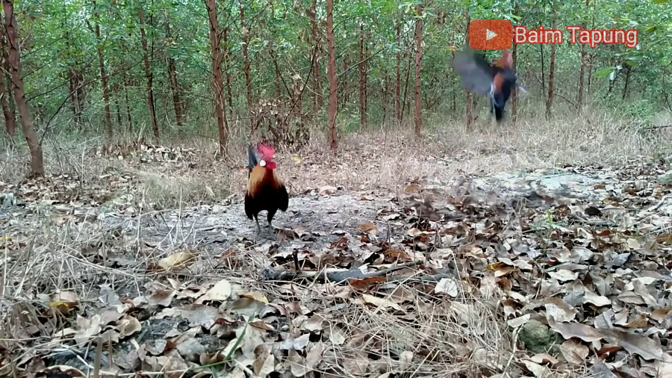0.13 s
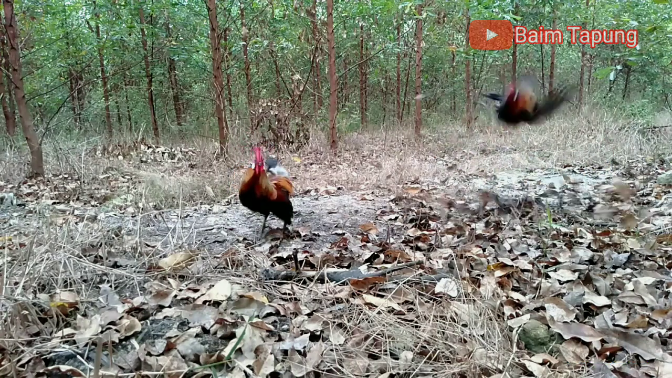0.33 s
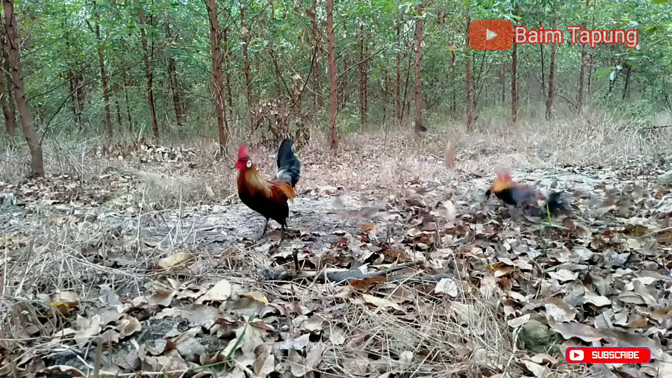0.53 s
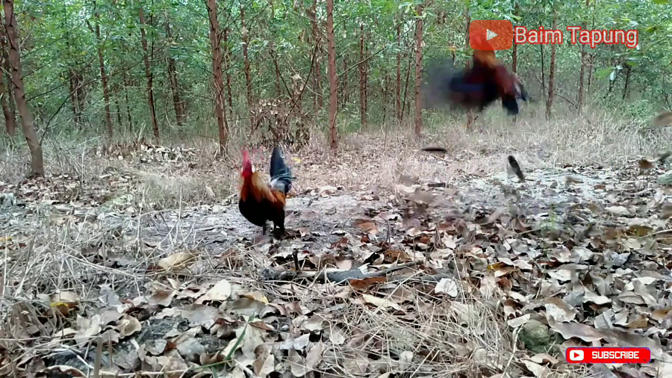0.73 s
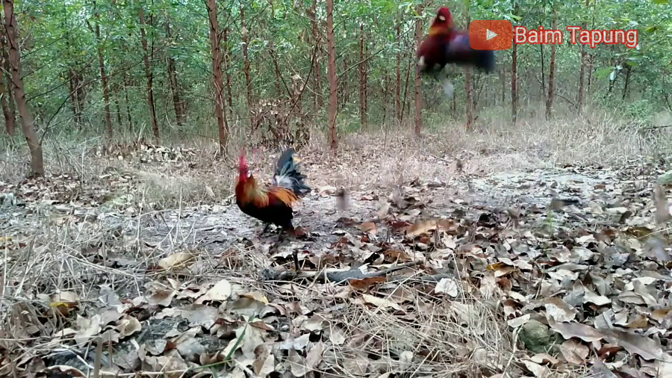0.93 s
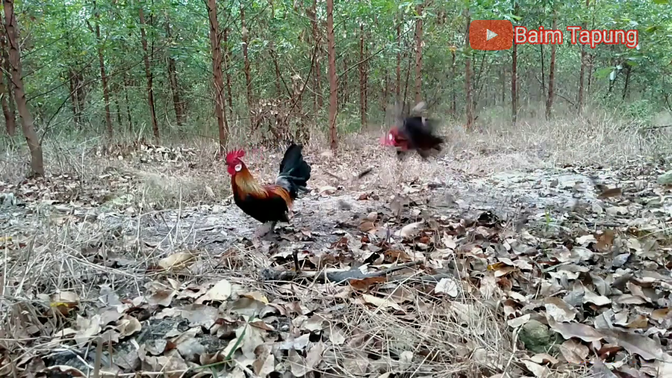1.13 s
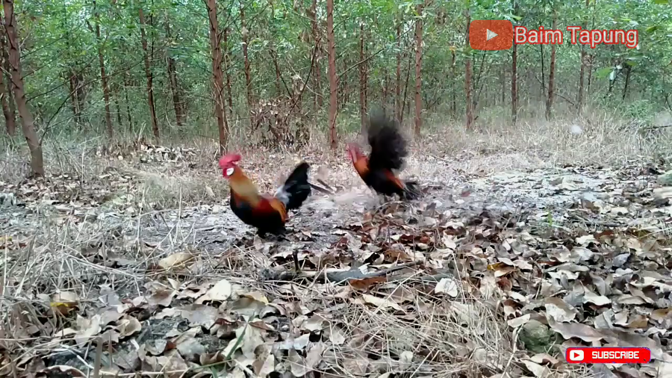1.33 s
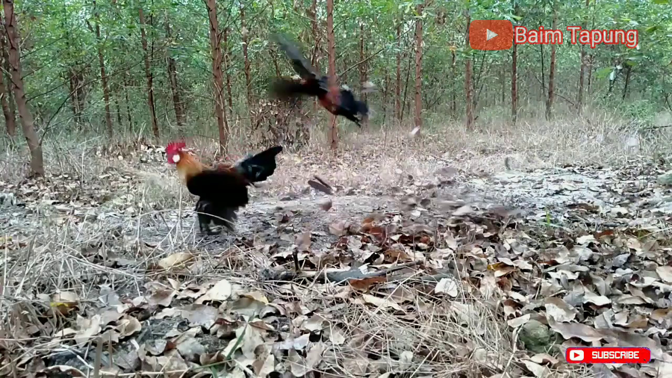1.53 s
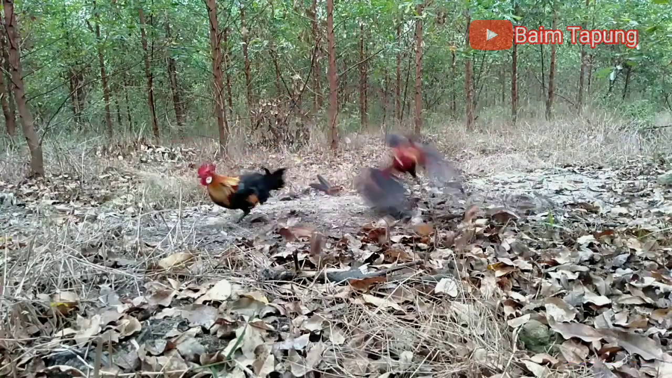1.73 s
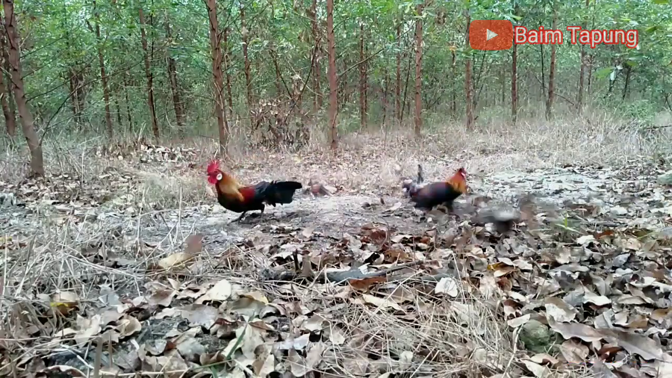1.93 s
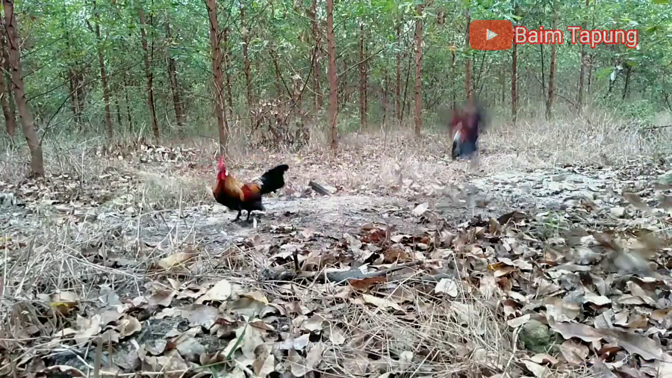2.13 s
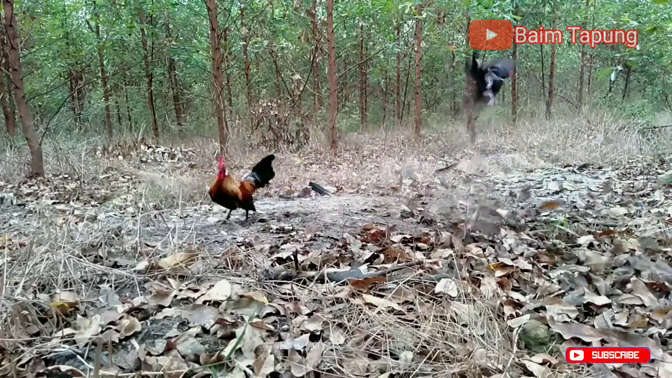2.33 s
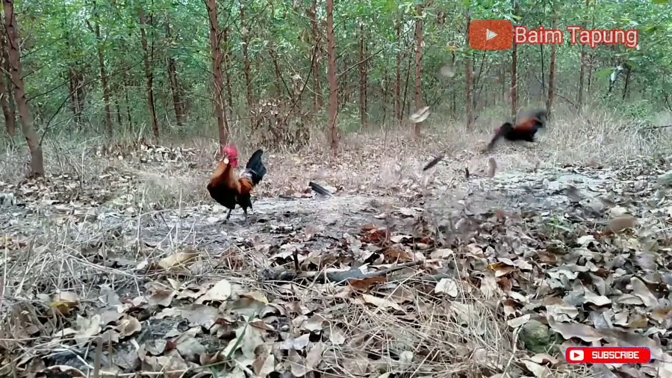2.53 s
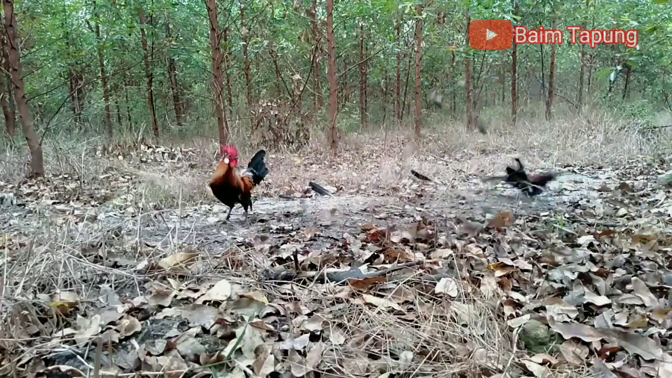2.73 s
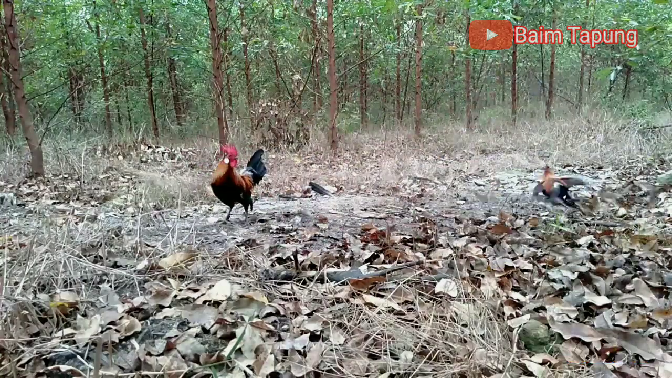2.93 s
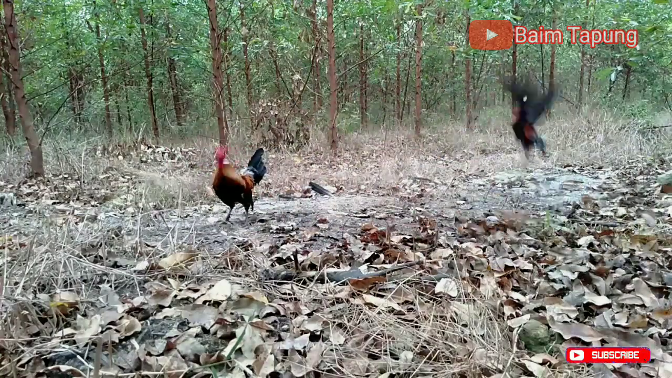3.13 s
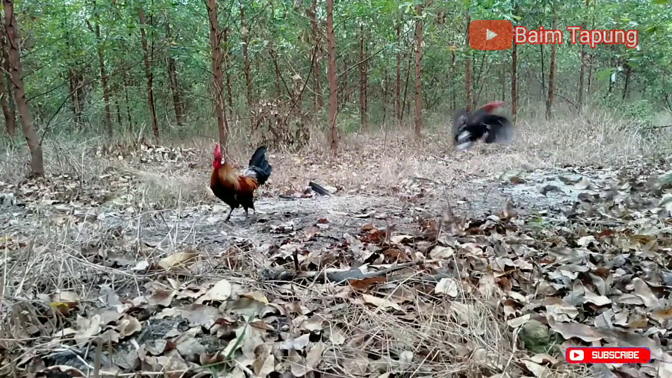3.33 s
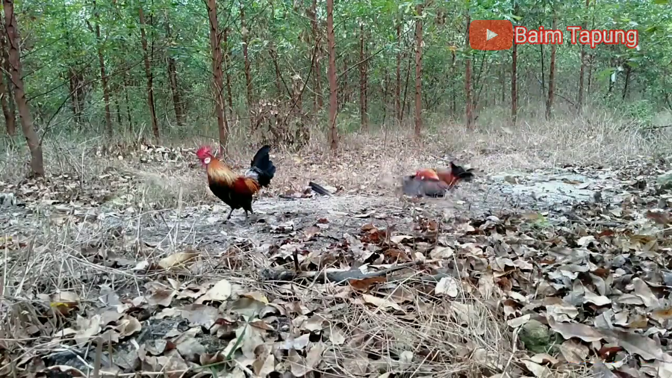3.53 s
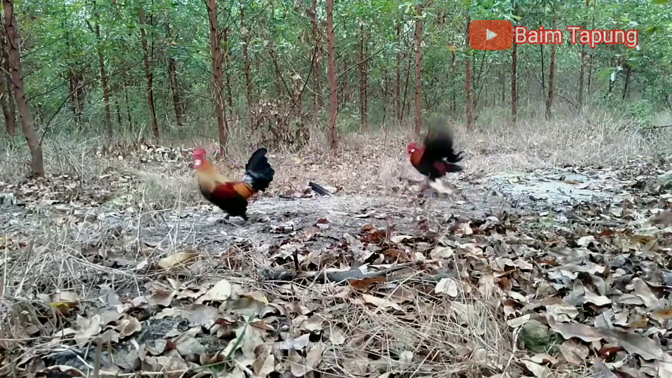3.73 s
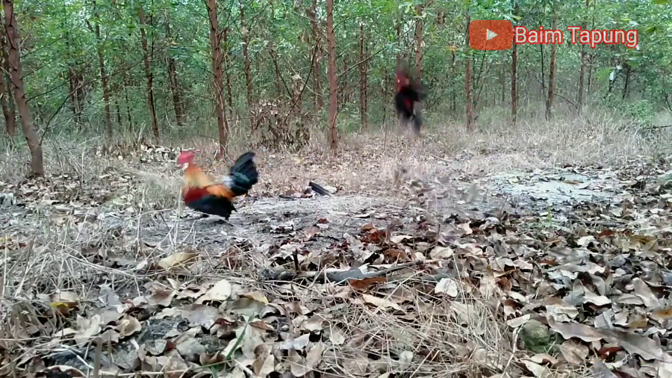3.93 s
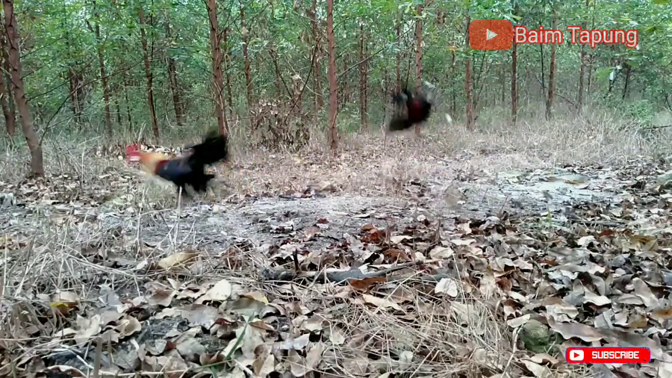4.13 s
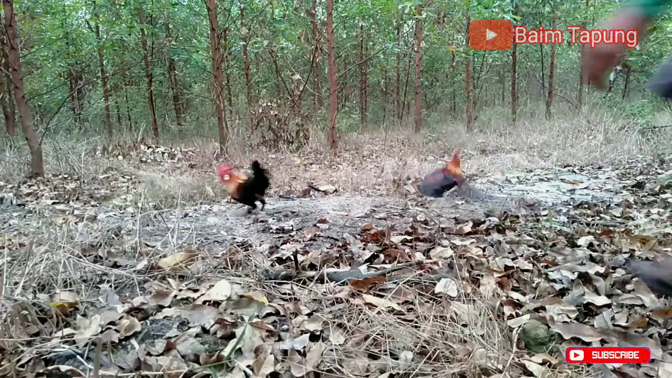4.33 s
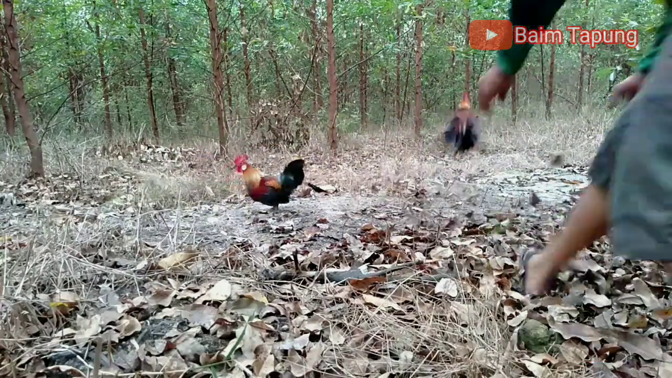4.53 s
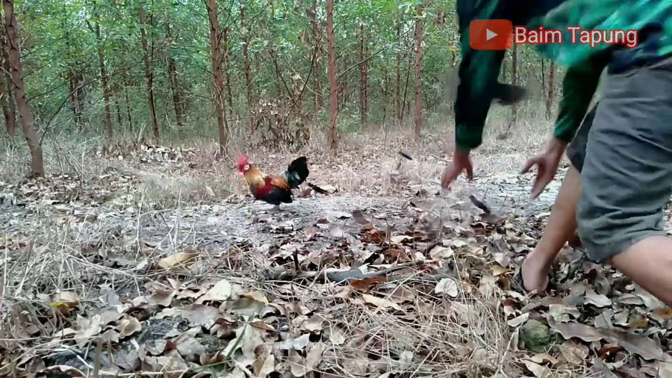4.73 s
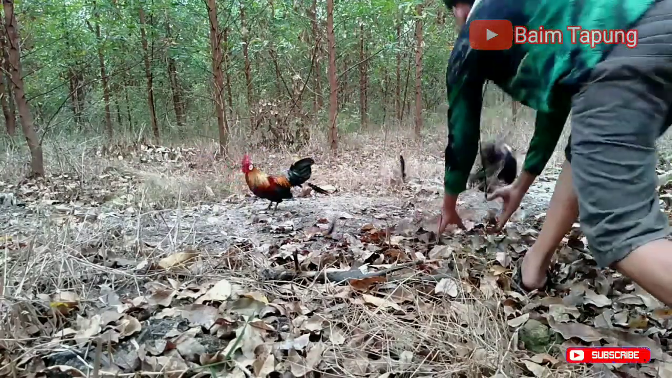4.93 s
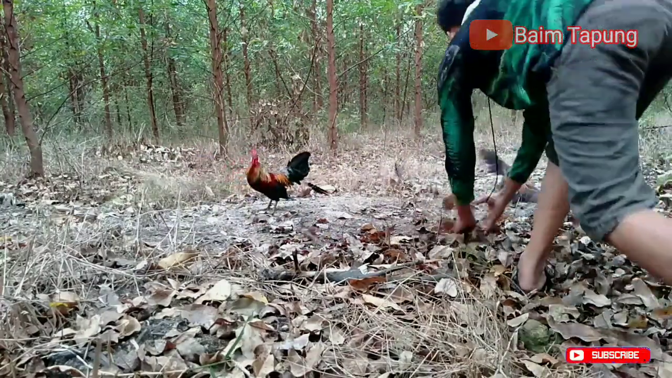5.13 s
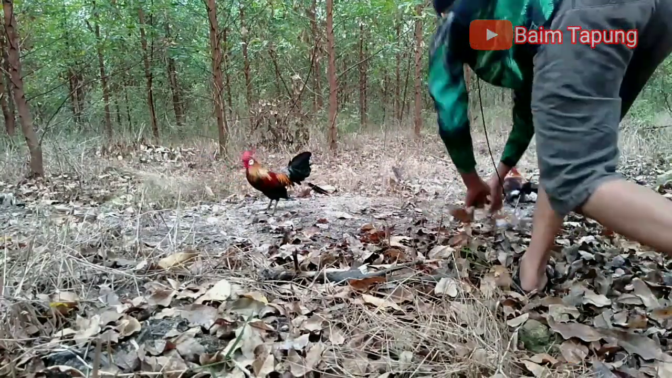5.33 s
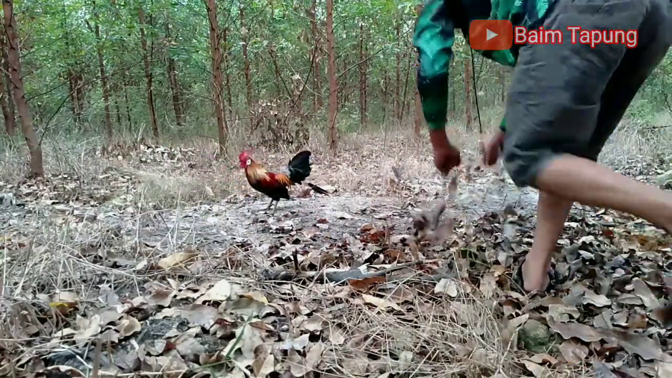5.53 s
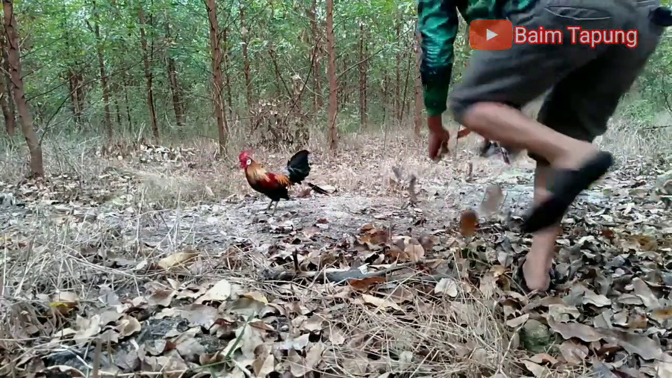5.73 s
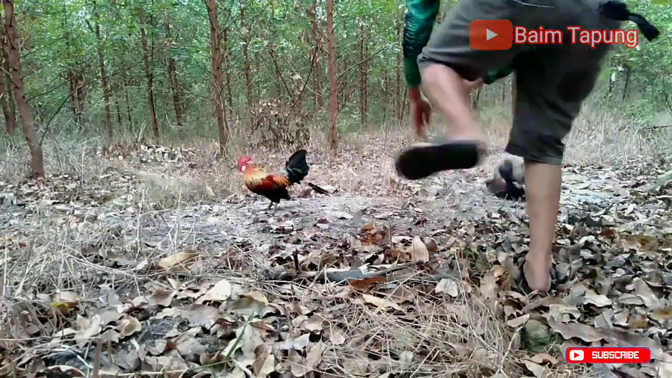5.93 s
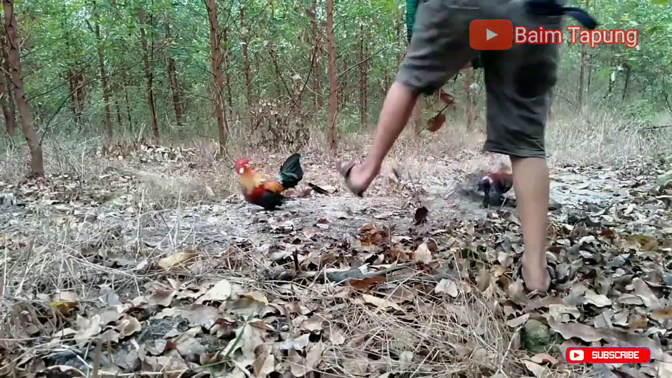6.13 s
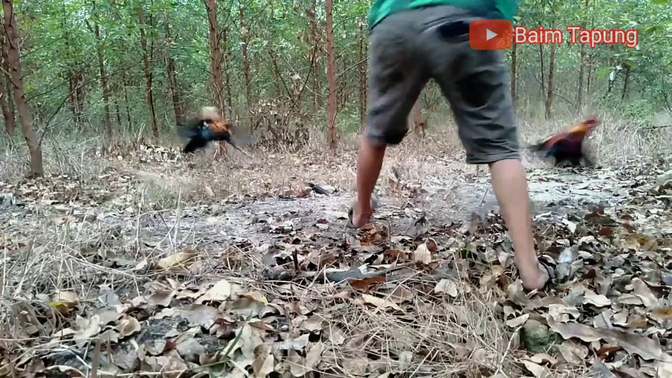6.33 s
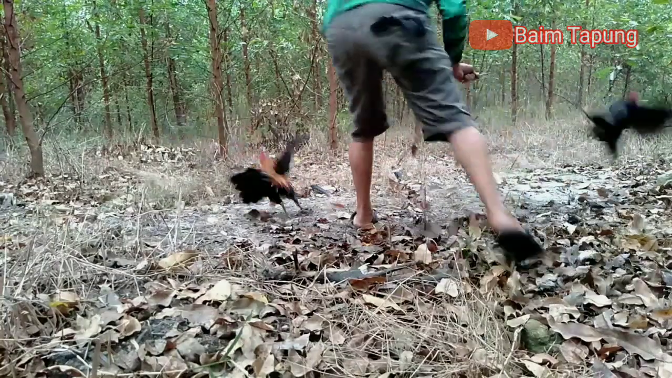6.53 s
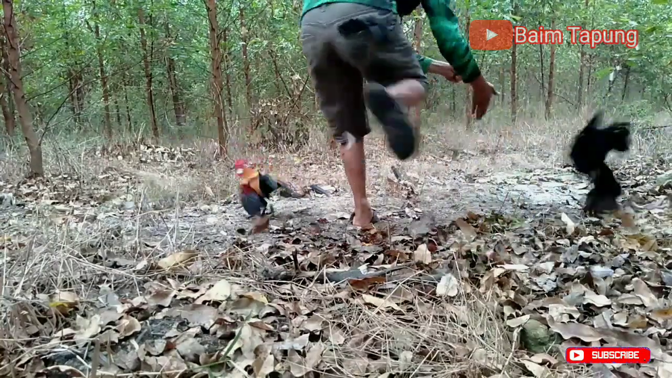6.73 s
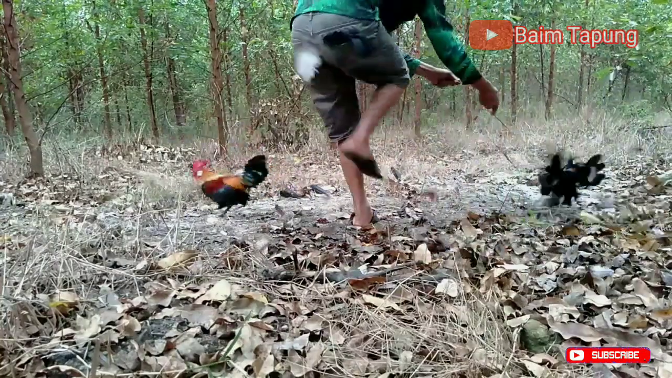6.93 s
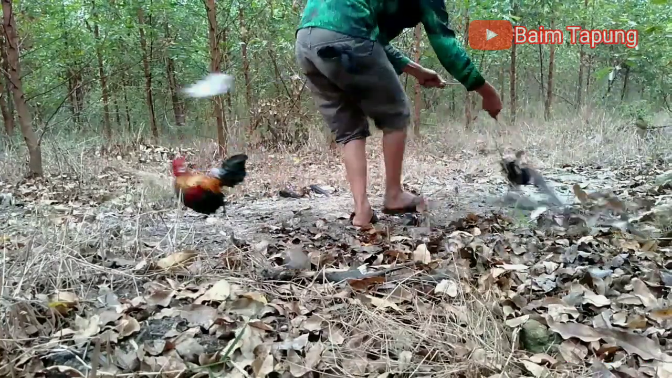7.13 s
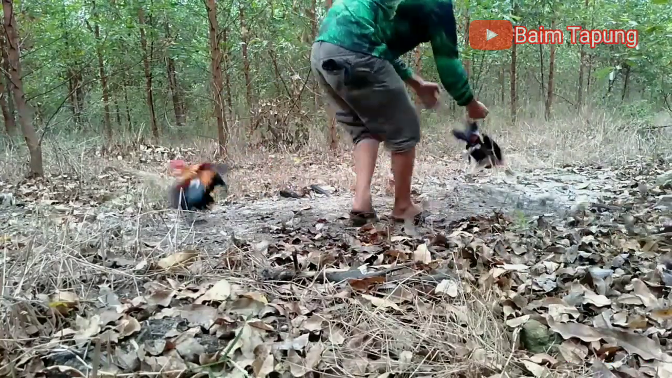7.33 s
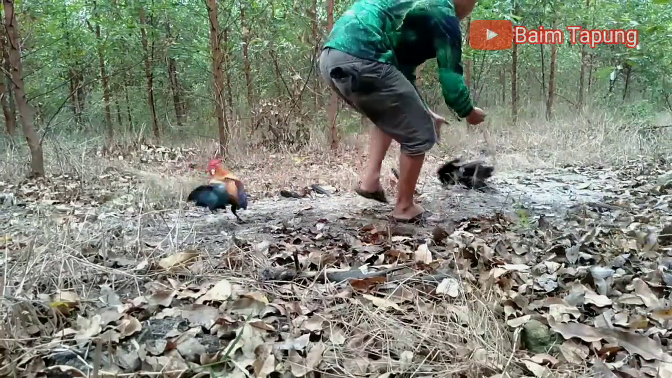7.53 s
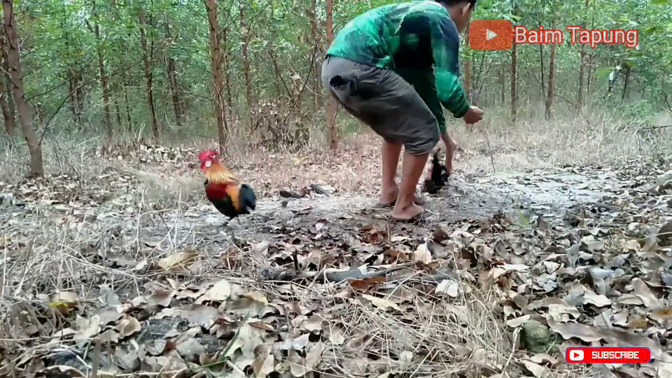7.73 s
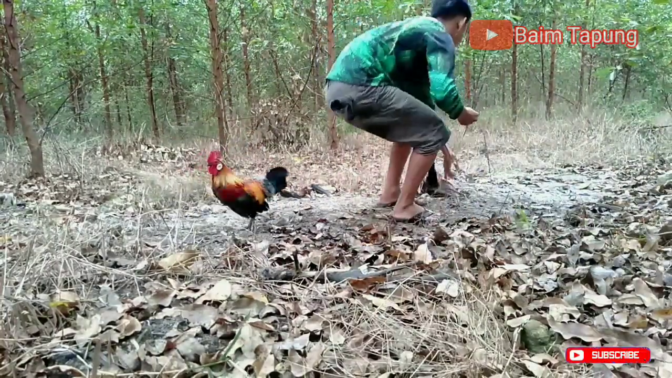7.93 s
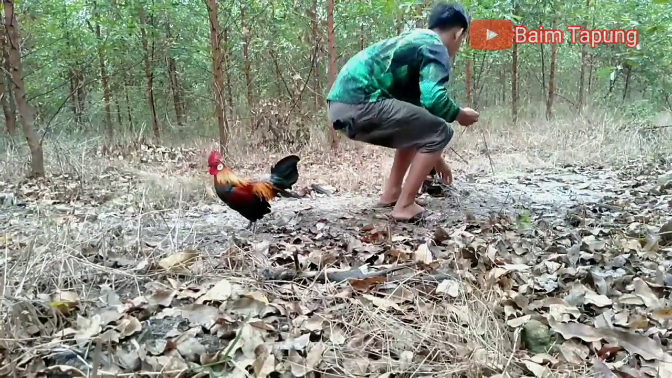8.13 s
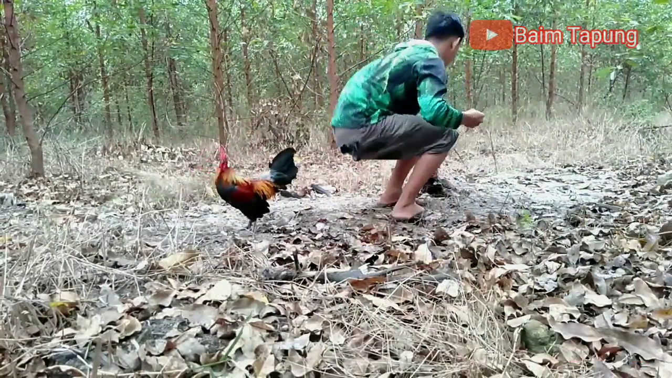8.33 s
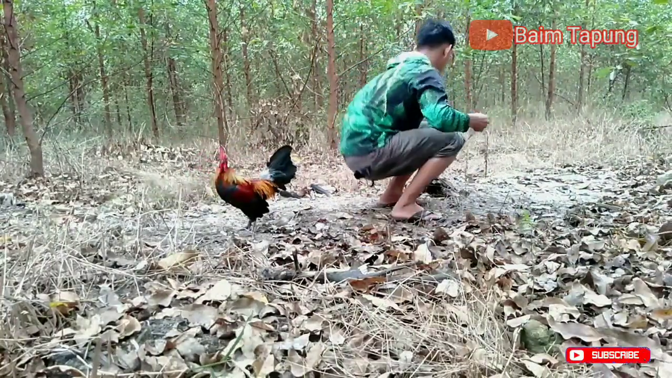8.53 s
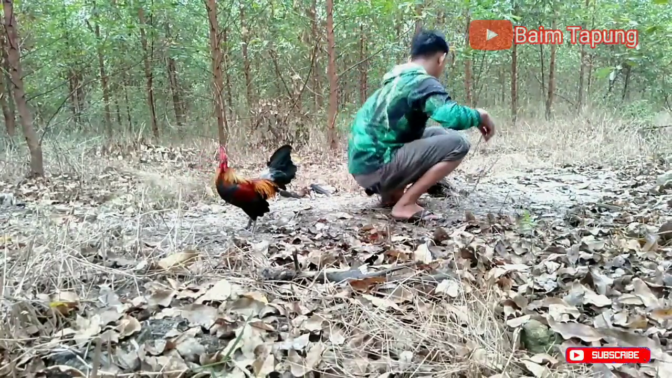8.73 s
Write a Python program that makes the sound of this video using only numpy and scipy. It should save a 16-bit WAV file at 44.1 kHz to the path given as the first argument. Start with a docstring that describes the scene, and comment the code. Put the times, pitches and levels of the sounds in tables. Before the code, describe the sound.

Dry leaves crackle from the start as a wild chicken beats its wings on a forest floor, buffeting the nearby microphone with low puffs of air. It gives brief, rough clucks and squawks between bouts of flapping, while twigs crack, steps crunch and a little metal rings thinly now and then. The trees return a slight echo. Everything finally settles and faint, far cicadas come up.

```python
"""A snared junglefowl thrashes in dry leaf litter among plantation trees. From the start, leaves rustle
and snap, wings clap and slap, and stirred air rumbles on the microphone. Clucks and squawks from its
syrinx join at 0.3 s and peak near 2.3 s, with thin rings as of metal on the tether. The struggle goes on
in bouts, the trunks echoing thinly. Near 8 s it dies down and the hiss of far cicadas rises."""
import sys
import numpy as np
from scipy import signal
from scipy.fft import rfft, irfft, next_fast_len
from scipy.io import wavfile
from scipy.ndimage import uniform_filter1d, map_coordinates

SR = 44100
rng = np.random.default_rng(int(sys.argv[2]) if len(sys.argv) > 2 else 0)


def inscribe(sig):
    """Save sig as 16-bit PCM at rate SR to the path in sys.argv[1].

    A 1-D sig is mono; a 2-D sig holds one channel per row.
    Samples are clipped to [-1, 1] before scaling.
    """
    pcm = np.round(np.clip(np.atleast_2d(sig).T, -1, 1) * 32767)
    wavfile.write(sys.argv[1], SR, pcm.astype(np.int16))


N = 391608

# bright spectrum of dry leaves: freq_hz, density_db
LEAF_SPECTRUM = [(600, -57), (2000, -14), (3500, -7), (4700, -9.5), (6560, -1), (8800, -11), (11500, -10.5),
                 (14200, -4.5), (15000, 3), (15500, -4)]
# dull spectrum of deep litter, feathers and impacts: freq_hz, density_db
DULL_SPECTRUM = [(150, -15.5), (300, 1), (650, -2.5), (1200, -2.5), (2000, -4.5), (3500, -15.5),
                 (6000, -22.5)]


def amp(db):
    """dB to gain."""
    return 10 ** (np.asarray(db) / 20)


def unit_rms(x):
    """x at rms 1."""
    return x / np.sqrt(np.mean(x ** 2) + 1e-20)


def at_hz(points, hz):
    """Interpolate (freq_hz, value) points on a log axis."""
    freq_hz, values = np.transpose(points)
    return np.interp(np.log(hz + 1), np.log(freq_hz + 1), values)


def timeline(points):
    """Interpolate (time_s, value) points per sample."""
    return np.interp(np.arange(N) / SR, *np.transpose(points))


def wobble(rate_hz, size=N):
    """Smooth random curve, rate_hz knots a second."""
    knots = rng.standard_normal(int(size * rate_hz / SR) + 4)
    return map_coordinates(knots, [np.arange(size) * rate_hz / SR])


def filtered(x, response):
    """Apply the gain response(hz) by FFT."""
    size = next_fast_len(len(x) + 8192)
    return irfft(rfft(x, size) * response(np.fft.rfftfreq(size, 1 / SR)), size)[:len(x)]


def coloured(x, spectrum):
    """x shaped by (freq_hz, gain_db) points, at rms 1."""
    return unit_rms(filtered(x, lambda hz: amp(at_hz(spectrum, hz))))


def noise(spectrum, size=N):
    """Coloured noise at rms 1."""
    return coloured(rng.standard_normal(size), spectrum)


def add(track, start_s, sound):
    """Mix sound into track in place."""
    part = track[round(start_s * SR):][:len(sound)]
    part += sound[:len(part)]


def clucks():
    """Syrinx harmonics pass two throat resonances; a rough voice shakes in pitch and turns to hiss."""
    # start_s, rise_ms, hold_ms, fall_ms, level_db, start_hz, mid_hz, end_hz,
    # throat_hz, width_hz, roughness (0-1), rasp_db, upper_db
    calls = [(.28, 18, 20, 11, -39.5, 795, 1041, 775, 1010, 270, 0.24, -6.5, -21),
             (0.471, 21.3, 4, 16, -45.5, 406, 537, 560, 1230, 330, 0.32, -14.5, -13),
             (.838, 5, 11.7, 4.5, -37.5, 950, 800, 750, 900, 400, 0.25, 1, -42),
             (.852, 9.9, 6.3, 12.7, -28, 803, 1054, 760, 1080, 400, 0.21, -1.5, -42.5),
             (.993, 17.3, 19, 6, -33, 796, 858, 760, 1320, 400, 0.57, 2, -49),
             (1.147, 13.2, 2, 12, -40, 1051, 1149, 1070, 1140, 220, 0.7, -8.5, -23),
             (1.195, 20, 3, 6.4, -54, 1238, 1187, 1114, 1216, 654, .2, 0.5, -24),
             (1.344, 28.5, 6, 13, -37.5, 519.5, 481, 480, 1220, 830, .8, 9, -33),
             (1.458, 7.7, 10, 16, -42, 590, 657, 700, 1370, 400, 0.44, -4, -12.5),
             (1.506, 14.1, 22, 24, -34.5, 524.4, 468, 465, 1430, 390, 0.78, 7.5, -36),
             (1.767, 6.9, 3, 32, -45, 393.4, 337, 420, 1430, 770, 0.7, 2, -26),
             (2.019, 5.6, 10, 25, -53, 495, 484, 500, 990, 1300, 0.46, -8, -35.5),
             (2.205, 20.5, 25, 11.4, -36.5, 798, 883, 740, 1630, 450, 0.89, 0.5, -33),
             (2.325, 6, 12, 3.4, -36.5, 1026, 1020, 1100, 1180, 500, 0.58, 4, -29),
             (2.338, 9, 11.3, 11.3, -27.5, 1127, 1360, 970, 1250, 450, 0.25, 4, -26),
             (2.461, 23, 20, 14, -50.5, 612, 517, 540, 1340, 570, 0.51, -18, -2),
             (2.635, 9, 3, 36, -47.5, 557, 564, 705, 1430, 561, .8, 4, -19),
             (2.837, 13, 2, 8.3, -54.5, 289, 359, 370, 1080, 520, 0.59, -11, -22.5),
             (3.166, 6.8, 36, 6, -47.5, 573, 690, 697, 1910, 500, .3, 8, -19),
             (3.2, 10, 18, 6, -42.5, 717, 750, 730, 1660, 660, 0.32, 9.5, -17),
             (3.306, 12, 5.9, 4.5, -40, 780, 1003, 1090, 1300, 700, .25, -8, -30),
             (3.32, 7.3, 24.3, 8.9, -35, 865, 826, 750, 1590, 440, 0.4, -6, -32),
             (3.454, 19.5, 2, 6.5, -49, 1270, 1135, 1140, 1216, 644, .05, 8.5, -24),
             (3.495, 21, 40, 30.5, -44, 778, 808, 920, 1780, 410, 0.57, 4.5, -24),
             (3.7, 32, 4, 15, -42.5, 495.5, 600, 515, 1070, 370, 0.27, -9, -28),
             (3.944, 30, 3, 12, -40, 1044, 920, 860, 1940, 420, 0.54, -7.5, -37),
             (4.077, 11.5, 32, 9.4, -39, 925, 1092, 960, 1320, 778, 0.34, -.5, -41),
             (4.12, 5, 15, 14, -43.5, 1446, 1395, 1350, 1431, 780, 0.49, 8.5, -28),
             (4.288, 13, 5, 18, -44, 938, 936, 940, 1900, 504, 0.48, -8, -7),
             (4.315, 18, 25, 36, -44, 927, 852, 834, 1786, 500, 0.48, -3.5, -32),
             (4.52, 15, 6, 24, -42.5, 870, 801, 860, 1880, 350, 0.58, -16, -13),
             (4.617, 24, 4.9, 31, -37.5, 559, 810, 833, 1710, 440, 0.34, 4.5, -2),
             (4.761, 28, 3, 24, -47, 346, 352, 390, 1325, 360, .44, -1, -21),
             (4.965, 36, 3, 29, -53, 826, 637, 614, 1270, 640, 0.6, -3.5, -26),
             (5.15, 14.4, 16, 18, -60, 744, 833, 802, 1410, 680, .6, 2, -32),
             (5.392, 7.5, 3, 35, -53.5, 282, 292, 355, 950, 400, 1, 4.5, -15.5),
             (5.56, 28, 3, 38, -42, 728, 777, 780, 1550, 690, .5, 10.5, -17),
             (5.69, 24, 7, 26, -33.5, 688, 880, 820, 1750, 470, 0.28, -0.5, -33),
             (5.84, 28, 70, 49, -54, 513, 523, 490, 1500, 830, .84, 9.5, -32),
             (6.109, 19, 3, 17, -48, 664, 709, 800, 1320, 510, 0.74, -1.5, -14),
             (6.322, 17, 15, 12, -45.5, 664, 732, 715, 1340, 550, 0.63, 3, -27),
             (6.388, 25.6, 4, 30, -39.5, 633, 758, 690, 1380, 480, 0.95, 8, -16),
             (6.53, 20.3, 11, 22, -38, 523, 487, 490, 1450, 320, 0.64, -4.5, -12),
             (6.686, 10.2, 49, 14, -47.5, 312.4, 367.5, 378, 1350, 443, 0.61, -3, -1),
             (6.742, 11.4, 33, 8, -47, 375, 373, 333, 1690, 704, 0.66, -3, 1),
             (6.98, 21, 8, 29, -52.5, 443, 515, 470, 1440, 400, 0.81, -12, -29),
             (7.066, 12, 3, 20, -51.5, 615, 626, 650, 1670, 520, .4, 2.5, -33),
             (7.202, 9.3, 29, 12, -43.5, 267.3, 281, 266, 1110, 506, .4, 4.5, -23),
             (7.37, 27, 24, 5.5, -50, 575, 627, 675, 1760, 590, 0.47, 10, 6),
             (7.411, 13, 26, 16, -50, 344.6, 305, 273, 1440, 960, 0.37, 4, 2),
             (7.745, 4.9, 28, 8.8, -56, 291, 289, 277, 960, 500, 0.36, -3, -26),
             (8.141, 5, 2, 7.9, -62, 830, 874, 790, 1012, 490, 0.27, 5.5, -24),
             (8.18, 7.2, 10, 53, -61.5, 1430, 1400, 1380, 1330, 710, 0.31, -4, -30)]
    # rasp above the resonances: freq_hz, gain_db
    rasp_spectrum = [(1200, -51), (2200, -24.5), (3200, -22.5), (4000, -23.5), (4800, -20), (5600, -28.5),
                     (6500, -25.5), (9000, -41.5), (15000, -38.5)]
    upper_hz, upper_width_hz = 2650, 36  # second windpipe resonance
    fade_db, fade_power = 19, 1.24
    gape = 0.13  # resonances start this share lower while the beak opens
    out, harmonics = np.zeros(N), np.arange(1, 13)[:, None]
    for (start_s, rise_ms, hold_ms, fall_ms, level_db, *pitch_hz,
         throat_hz, width_hz, roughness, rasp_db, upper_db) in calls:
        def throat(hz):
            lower = 1 / (1 + abs((hz - throat_hz) / width_hz) ** 3)
            upper = amp(upper_db) / (1 + ((hz - upper_hz) / upper_width_hz) ** 2)
            return (lower + upper) * hz ** 4 / (hz ** 4 + 520 ** 4)  # a small beak radiates little bass

        corners_s = start_s + np.cumsum([0, rise_ms, hold_ms, fall_ms]) / 1000
        _, top_s, release_s, end_s = corners_s
        t = np.arange(start_s - 0.004, end_s + 0.0074, 1 / SR)
        jitter = 1 + 0.0923 * roughness * wobble(151, len(t))
        f0_hz = np.interp(t, [start_s, (top_s + release_s) / 2, end_s], pitch_hz) * jitter
        phase = 2 * np.pi * np.cumsum(f0_hz) / SR
        opening = np.interp(t, [start_s, release_s], [1 - gape, 1])
        gains = throat(harmonics * f0_hz / opening)
        offsets = rng.uniform(0, 2 * np.pi, harmonics.shape)
        tone = np.sum(gains * np.sin(harmonics * phase + offsets), axis=0)
        tone /= np.sqrt(np.sum(gains ** 2, axis=0) / 2)
        tone *= amp(0.66 * roughness * wobble(210, len(t)))
        hiss = unit_rms(filtered(rng.standard_normal(len(t)), throat))
        # the membranes release one turbulent puff per cycle
        puffs = rng.standard_normal(len(t)) * (1 + 0.27 * np.cos(phase))
        buzz = np.sum(amp(at_hz(rasp_spectrum, harmonics * f0_hz)) * np.sin(harmonics * phase), axis=0)
        rasp = coloured(puffs, rasp_spectrum) + amp(-5) * unit_rms(buzz)
        voice = np.sqrt(1 - roughness ** 2) * tone + roughness * hiss + amp(rasp_db - 18.5) * rasp
        envelope = amp(level_db - fade_db * np.interp(t, corners_s, [1, 0, 0, 1]) ** fade_power)
        edges = np.clip(np.minimum(t - t[0], t[-1] - t) / 0.006, 0, 1)
        add(out, t[0], edges * envelope * voice)
    return out


def wing_claps():
    """Air trapped between the wings swells for a few low cycles; ruffled feathers trail it."""
    # time_s, level_db, pitch_hz, cycles
    claps = [(0.173, -40.5, 456, 5.7), (0.253, -38.5, 330, 3.8), (0.912, -44, 268, 3.8),
             (1.254, -47, 312, 3.9), (1.543, -40, 347, 6.9), (1.64, -45.5, 318, 4.4),
             (2.277, -27.5, 358, 4.5), (2.37, -31.5, 368, 6.5), (3.251, -33.5, 342, 5.9),
             (4.041, -35.5, 334, 6), (4.141, -41, 306, 6.4), (4.508, -46.5, 258, 4.8),
             (4.614, -37.5, 332, 4.4), (4.706, -39, 353, 3.3), (5.601, -40.5, 360, 3.7),
             (5.698, -32, 352, 6.2), (6.409, -40.5, 312, 3.5), (6.495, -40.5, 339, 5.6),
             (7.183, -38, 268, 3.4), (7.921, -61, 273, 3)]
    out = np.zeros(N)
    for time_s, level_db, pitch_hz, cycles in claps:
        length_s = cycles / pitch_hz
        progress = np.arange(round(4 * length_s * SR)) / SR / length_s
        swell = np.sin(np.pi * np.minimum(progress / 0.9, 1)) ** 2
        hollow = swell * np.sin(2 * np.pi * cycles * progress)
        trail = (1 - np.exp(-4 * progress)) * np.exp(-1.3 * progress)
        feathers = trail * noise(DULL_SPECTRUM, len(progress))
        add(out, time_s - 0.002, amp(level_db) * (hollow + 0.4 * feathers))
    return out


def ground_slaps():
    """Wing or foot hits the ground: a push of air that swings back once, and a short dull burst."""
    # time_s, level_db, body_db
    hits = [(.226, -48.5, 4.5), (0.59, -42.5, 0), (0.727, -41.5, -24), (0.818, -55.5, 9),
            (1.447, -42, -0.5), (1.608, -46.5, 2), (2.195, -50, -0.5), (2.734, -44, 7.5),
            (2.777, -42.5, -3), (2.924, -51.5, -2), (3.616, -51, 4), (4.351, -45.5, 8), (4.428, -35, -1.5),
            (5.234, -59.5, 2), (5.526, -53, 7.5), (5.673, -46, -5), (6.002, -45, 3), (6.071, -47.5, -19.5),
            (6.219, -41.5, -17), (6.846, -42, -0.5), (7.119, -43, 2), (7.124, -36, -4.5), (7.258, -47.5, 8),
            (7.335, -49, 8), (7.597, -58, 11), (7.859, -66, 9)]
    push_hz, burst_t60_s = 232, 0.027
    out, t = np.zeros(N), np.arange(SR // 20) / SR
    push = -3.1 * np.sin(2 * np.pi * push_hz * t) * np.exp(-2.2 * push_hz * t)
    push *= 1 - np.exp(-t / 0.00045)
    for time_s, level_db, body_db in hits:
        envelope = amp(body_db - 60 * t / burst_t60_s) * (1 - np.exp(-t / 0.00053))
        burst = envelope * noise(DULL_SPECTRUM, len(t))
        add(out, time_s + 0.0041, amp(level_db) * (push + burst))
    return out


def twig_snaps():
    """A twig or leaf breaks sharply with a dull body; thrown leaves settle in clumps."""
    # start_s, level_db, body_db, scatter_db
    breaks = [(0.022, -33.5, -2.5, -4), (0.1204, -31, -6.5, -9), (0.4423, -34.5, -32.5, -17),
              (0.5836, -43, -12, 1), (0.726, -41, 4, -16), (1.1939, -36.5, -11.5, -9),
              (1.3221, -37, -2, -2.5), (1.363, -30.5, 2, -4.5), (1.506, -35.5, -0.5, -7),
              (1.6125, -32, -20, -19), (1.951, -37.5, -10.5, -10), (2.1386, -35, -8, -8),
              (2.445, -30, -18.5, -15.5), (2.5546, -41, -11.5, -10), (2.6793, -31.5, -17.5, -10),
              (2.8515, -31, -21.5, -21.5), (2.8937, -43, -28, -7.5), (2.922, -44.5, -20, -5.5),
              (3.0842, -36, -32.5, -6), (3.4714, -43.5, -4, -18), (3.5554, -30.5, -21.5, -20.5),
              (3.692, -27, -13.5, -13), (3.91, -36.5, -3, -13), (4.0941, -34.5, -20.5, 1),
              (4.422, -31.5, -7.5, -5), (4.579, -34.5, -11.5, -14), (5.0157, -42, -25, -17),
              (5.188, -38, -12, -13.5), (5.5565, -36, 0, -7), (5.6441, -45, -17, -0.5),
              (6.1474, -36.5, -3.5, -13.5), (6.2221, -31, -5.5, -7), (6.4684, -29, -10.5, -21.5),
              (6.7297, -38, -13, -9.5), (6.8517, -38, -5.5, 1), (6.9446, -29, -29, -16),
              (7.0584, -40, -8, -4.5), (7.1304, -20.5, -8, -14.5), (7.3337, -40.5, 0.5, -3.5),
              (7.69, -47.5, -2, -14), (7.698, -48.5, 1, -8), (7.9314, -49.5, 1, -10),
              (7.984, -47.5, -29.5, -25), (7.9994, -43, -25, -27), (8.1003, -57.5, -16.5, -14.5),
              (8.3299, -52, -19, -14.5)]
    crack_t60_s, body_t60_s, scatter_t60_s = 0.015, 0.051, 0.25
    out, t = np.zeros(N), np.arange(SR // 8) / SR
    impulse = signal.unit_impulse(64, 24)
    click = filtered(impulse, lambda hz: amp(1.2 * at_hz(LEAF_SPECTRUM, hz)))
    crack = amp(-4.5 - 60 * t / crack_t60_s)
    for start_s, level_db, body_db, scatter_db in breaks:
        bright = noise(LEAF_SPECTRUM, len(t))
        body = noise(DULL_SPECTRUM, len(t)) * amp(body_db - 60 * t / body_t60_s)
        settling = amp(scatter_db - 60 * t / scatter_t60_s + 2.8 * wobble(121, len(t)))
        settling *= 1 - np.exp(-t / 0.0033)
        add(out, start_s, amp(level_db - 7.5) * (bright * (crack + settling) + body))
        add(out, start_s, -amp(level_db + 5.5) * click / click.max())
    return out


def tether_rings():
    """Thin decaying tones that waver, as of small metal swinging on the tether."""
    # start_s, pitch_hz, level_db, t60_s
    pings = [(2.226, 4700, -51, 0.2), (2.344, 4630, -37.5, 0.24), (2.68, 10600, -45, 0.083),
             (2.68, 13400, -42, 0.068), (.443, 13500, -42, 0.056), (5.017, 13400, -46, 0.059),
             (5.645, 10700, -62, 0.092), (5.645, 13400, -57, .1)]
    out, t = np.zeros(N), np.arange(SR // 4) / SR
    for start_s, pitch_hz, level_db, t60_s in pings:
        tone = np.sin(2 * np.pi * pitch_hz * t + 1.3 * wobble(300, len(t)))
        envelope = amp(level_db - 60 * t / t60_s) * (1 - np.exp(-t / 0.0022))
        add(out, start_s, envelope * tone)
    return out


def wing_bouts():
    """Gains of stirred air and deep litter: each bout of beating rises fast, holds and settles."""
    # start_s, length_s, air_db, deep_db
    bouts = [(0, 0.44, -57, -64), (0.567, 0.092, -59.5, -65), (0.745, .45, -59, -67),
             (1.208, 0.43, -57, -67), (1.684, 0.26, -63, -68.5), (2.205, 0.19, -55.5, -60),
             (2.454, 0.34, -67.5, -71.5), (2.927, 0.029, -76.5, -78), (3.167, 0.1, -57, -72),
             (3.372, 0.33, -68.5, -67), (3.892, 0.28, -60.5, -63.5), (4.22, 0.2, -72, -70),
             (4.396, 0.35, -59, -66.5), (4.838, 0.47, -64.5, -73), (5.53, 0.21, -57.5, -63.5),
             (5.884, .28, -65.5, -71), (6.206, 0.42, -60, -67), (6.857, 0.04, -63, -65),
             (6.95, 0.15, -72.5, -76.5), (7.097, 0.23, -58.5, -67.5), (7.506, 0.33, -80.5, -89)]
    rise_s, fall_s = 0.013, np.array([[0.022], [0.052]])  # fall: air, litter
    hop = 32
    t, gains = np.arange(0, N, hop) / SR, 0
    for start_s, length_s, *levels_db in bouts:
        ramps = np.minimum((t - start_s) / rise_s, (start_s + length_s - t) / fall_s)
        gains += amp(levels_db)[:, None] * np.exp(np.minimum(0, ramps))
    return np.repeat(gains, hop, axis=1)[:, :N]


def leaf_crackle(rate_hz, spread_db):
    """Bright noise carrying random clicks of dry leaves."""
    onsets = rng.random(N) < rate_hz / SR
    clicks = onsets * amp(np.minimum(spread_db * rng.exponential(size=N), 13))
    envelope = 1 + 24 * uniform_filter1d(clicks, size=24)
    return coloured(rng.standard_normal(N) * envelope, LEAF_SPECTRUM)


def thrashing():
    """Leaves rustle in clumps, deep litter follows, and wing gusts buffet the microphone."""
    # dry leaves: time_s, level_db
    rustle_levels = [(0.0, -63.5), (0.47, -63), (0.79, -57.5), (1.26, -66), (1.48, -56.5), (1.98, -60),
                     (2.4, -58), (2.65, -58.5), (2.92, -56.5), (3.58, -51.5), (3.83, -56.5), (4.57, -60.5),
                     (4.72, -61), (5.96, -65.5), (6.4, -60.5), (6.73, -65.5), (6.87, -65), (7.05, -58.5),
                     (7.22, -53), (7.37, -60), (7.71, -56.5), (7.99, -66), (8.36, -76), (8.88, -85)]
    # gust rumble: freq_hz, density_db
    air_spectrum = [(15, -20.5), (30, 0.5), (60, -10), (160, -9), (300, -19), (600, -42.5)]
    rustle = amp(timeline(rustle_levels))
    bout_air, bout_deep = wing_bouts()
    tossed = amp(-4) * bout_deep
    clumps = wobble(25)
    leaf_gain = (rustle + tossed) * amp(1.3 * clumps + 0.89 * wobble(90))
    leaves = leaf_gain * leaf_crackle(rate_hz=110, spread_db=2.5)
    deep_gain = (bout_deep + amp(-12.5) * rustle) * amp(3.7 * clumps + 2.7 * wobble(40))
    deep = deep_gain * noise(DULL_SPECTRUM)
    air_gain = (bout_air + amp(-21.5) * rustle) * amp(3.3 * clumps + 3.3 * wobble(25))
    return leaves + deep + air_gain * noise(air_spectrum)


def trunk_echo(x):
    """The trunks return a diffuse tail; each frequency decays at its own rate."""
    # freq_hz, t60_s
    decay_times = [(300, 0.067), (1500, 0.21), (5000, 0.83), (12000, 0.21)]
    hz, t, bins = signal.stft(rng.standard_normal(SR // 2), SR, nperseg=256)
    decay = amp(-60 * t / at_hz(decay_times, hz)[:, None])
    _, tail = signal.istft(bins * decay, SR, nperseg=256)
    delayed = np.pad(x, (300, 0))
    return signal.fftconvolve(delayed, tail / np.linalg.norm(tail))[:N]


def cicadas():
    """Far chorus: a band of hiss with fast flutter."""
    # time_s, level_db
    chorus_levels = [(0, -80), (7.9, -78), (8.1, -72.5), (8.88, -73)]
    # freq_hz, density_db
    chorus_spectrum = [(3600, -53), (4300, -10.5), (5200, -3), (5700, -10.5), (6100, -44)]
    return amp(timeline(chorus_levels) + 0.81 * wobble(49)) * noise(chorus_spectrum)


def hush():
    """Still air and microphone self-noise."""
    # freq_hz, density_db
    hush_spectrum = [(20, -12.5), (60, -4.5), (200, -18.5), (500, -28.5), (1500, -26), (4000, -32.5),
                     (10000, -31.5), (13500, -27), (15500, -19.5)]
    return amp(-72) * noise(hush_spectrum)


def scene():
    """Bird, litter, echo and background at one microphone."""
    voice = clucks()
    blows = wing_claps() + ground_slaps() + twig_snaps() + tether_rings()
    echo = trunk_echo(amp(-11.5) * voice + amp(-14.5) * blows)
    return (voice + blows + echo + thrashing() + cicadas() + hush())[None]


def record(dry):
    """Brick-wall low-pass."""
    cutoff_hz = 15600
    return filtered(dry[0], lambda hz: hz < cutoff_hz)[None]


dry = scene()
out = record(dry)
inscribe(out)
```